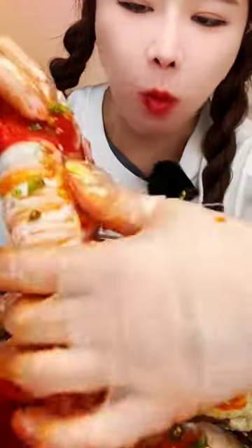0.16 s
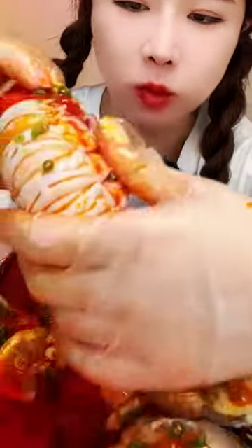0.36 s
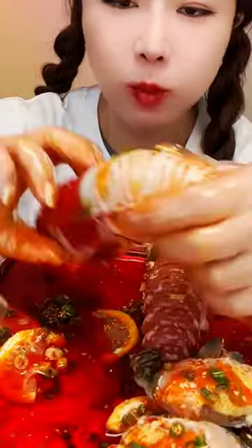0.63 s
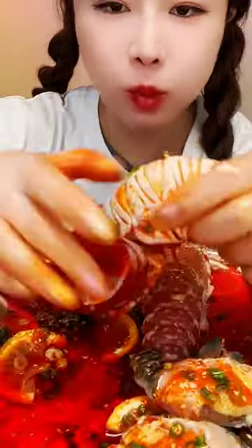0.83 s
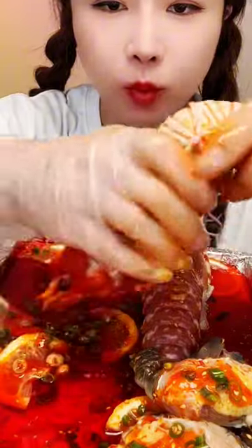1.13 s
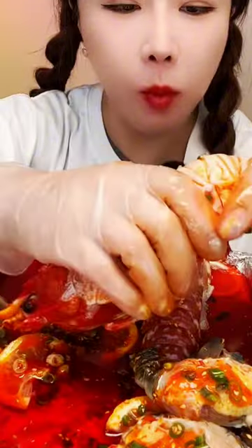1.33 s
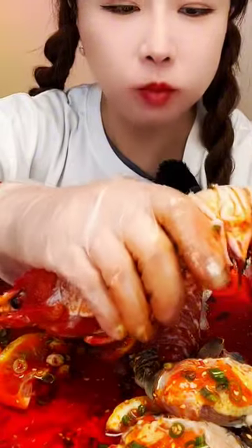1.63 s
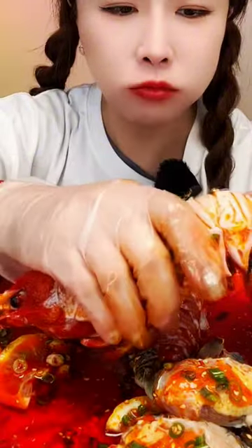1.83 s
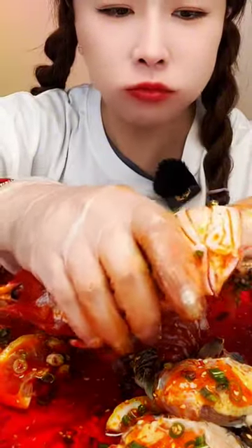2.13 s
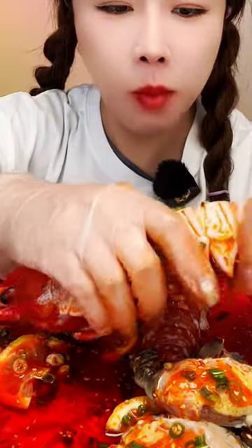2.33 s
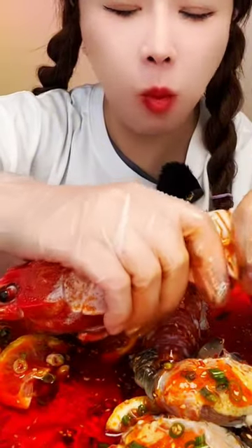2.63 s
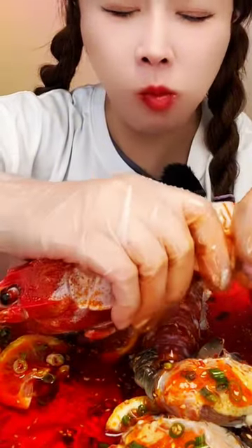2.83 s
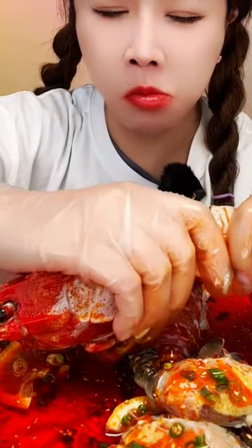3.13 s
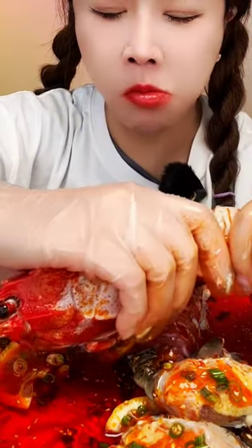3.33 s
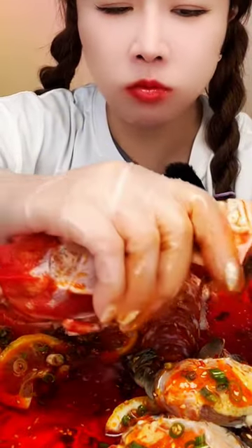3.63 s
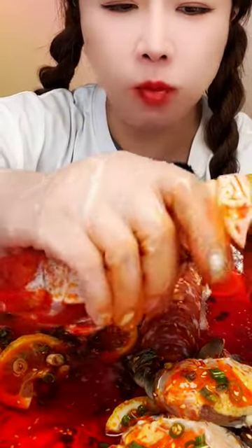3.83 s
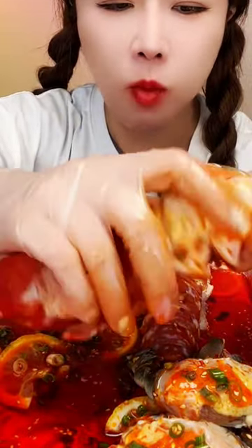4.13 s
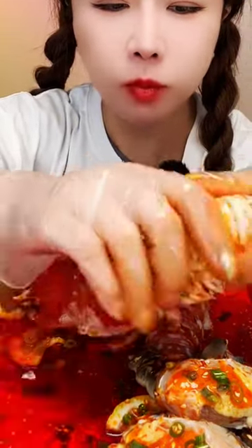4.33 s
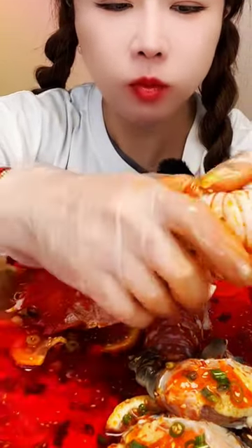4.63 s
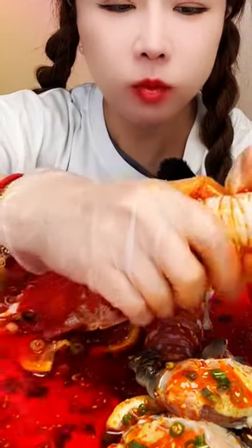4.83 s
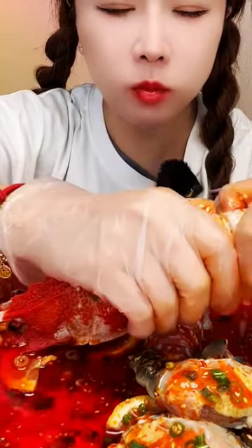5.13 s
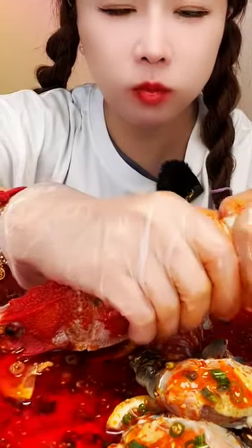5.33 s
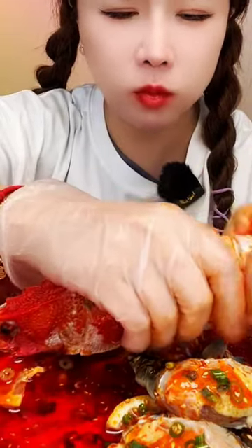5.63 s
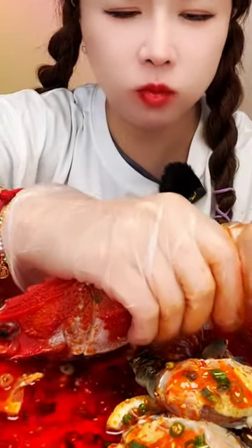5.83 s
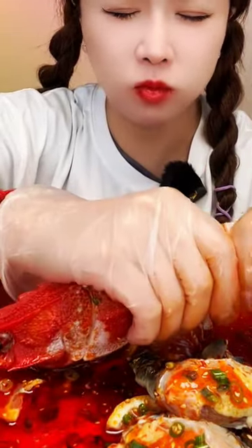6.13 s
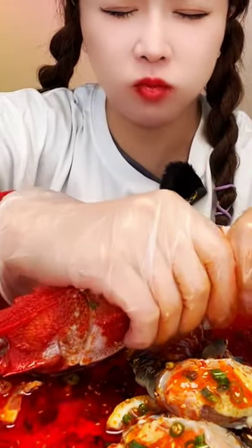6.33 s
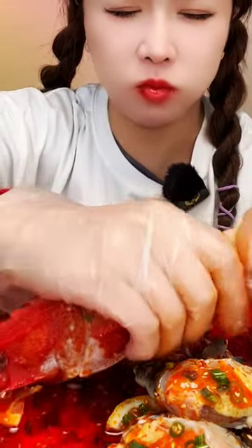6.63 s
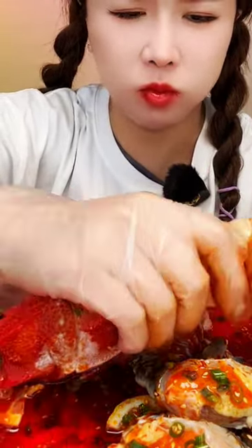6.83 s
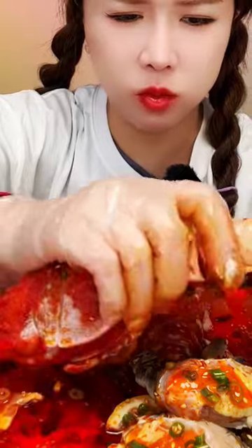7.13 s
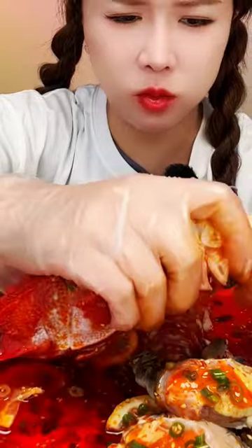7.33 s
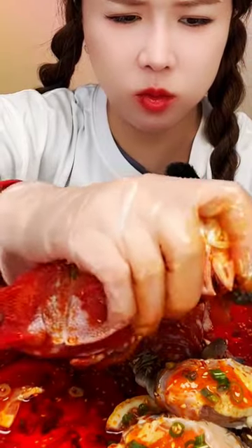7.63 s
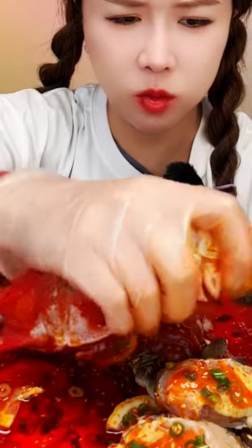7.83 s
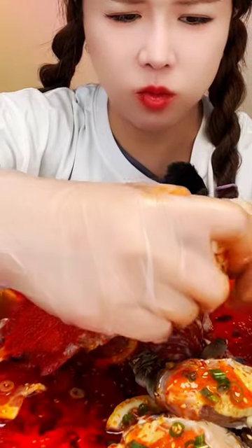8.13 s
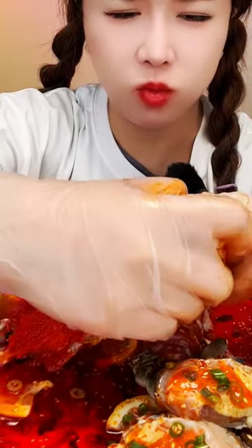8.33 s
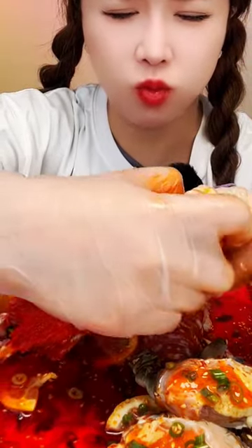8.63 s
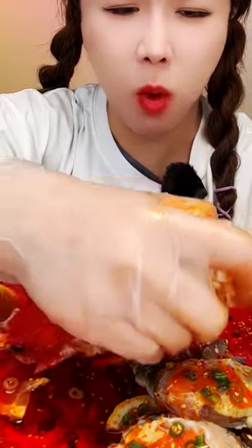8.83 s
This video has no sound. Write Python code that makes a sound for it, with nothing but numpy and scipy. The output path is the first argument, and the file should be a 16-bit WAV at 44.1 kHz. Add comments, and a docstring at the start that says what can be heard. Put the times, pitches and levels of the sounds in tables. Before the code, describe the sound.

Close to the microphone in a small room, a lobster is pulled apart by hand. Sticky squelches, little plops and a knocking crack come first, followed by loud, crisp snaps of shell. Uneven bursts of cracking and tearing continue throughout, separated by quieter ticking and wet rubbing. Oily plastic gloves crinkle with each grip, and a soft rumble and faint low hum lie underneath.

```python
"""Twisting a lobster apart

Hands in thin plastic gloves break a cooked lobster over a tray of sauce, close-miked in a small room.
The shell cracks, pings and tears in runs of splinters; wet flesh squelches, sauce slops, and the gloves
crinkle and slide with each grip. Underneath: dull hand rumble, a low hum, faint room noise.
Hard snaps make the gain control duck everything; it recovers within about a quarter second."""
import sys
import numpy as np
from scipy import signal
from scipy.fft import rfft, irfft
from scipy.io import wavfile
from scipy.ndimage import uniform_filter1d, minimum_filter1d

SR = 44100
rng = np.random.default_rng(int(sys.argv[2]) if len(sys.argv) > 2 else 0)


def pcm_store(signal):
    """Save signal as 16-bit PCM."""
    levels = np.round(np.clip(np.atleast_2d(signal), -1, 1) * 32767)
    wavfile.write(sys.argv[1], SR, levels.astype(np.int16).T)


N = 395577
TIME_S = np.arange(N) / SR
BOTTOM_HZ, TOP_HZ = 38, 15600
SLIPS_PER_S, SLIP_SPREAD_DB = 10000, 2.3
CRINKLE, RUBBING = 1, 2  # columns of HAND_WORK

# Levels are relative within each table.
# weight of the handling: time_s, level_db
RUMBLE_LEVELS = [(0.0, -45.5), (0.59, -44.5), (0.7, -43), (0.79, -42), (0.98, -51), (1.08, -48),
                 (1.19, -45.5), (1.77, -43.5), (1.82, -48), (2.26, -51.5), (2.75, -44.5), (2.81, -61),
                 (2.98, -49.5), (3.1, -45), (3.15, -38.5), (3.2, -54.5), (3.53, -46), (3.86, -46),
                 (4.07, -45.5), (4.16, -57), (4.26, -46.5), (4.57, -51.5), (4.78, -44), (4.87, -53),
                 (4.98, -44), (5.1, -54), (5.21, -43), (5.31, -54), (5.41, -46), (5.46, -54), (6.11, -44.5),
                 (6.52, -49.5), (6.6, -55), (6.78, -52.5), (7.22, -45), (7.32, -49), (7.74, -43),
                 (7.83, -56), (7.89, -50), (8.09, -53), (8.4, -47), (8.53, -56), (8.89, -47), (8.97, -53)]
# low hum: time_s, level_db
HUM_LEVELS = [(0, -59), (2.2, -59), (2.6, -46), (3.3, -49.5), (3.65, -37), (3.85, -51.5), (5.6, -69),
              (5.9, -47), (6.3, -70), (8.97, -74)]
# steady work of the hands: time_s, crinkle_db, rubbing_db
HAND_WORK = [(0, -40.5, -42.5), (.55, -43.5, -41.5), (.8, -48, -44.5), (1.3, -37, -38.5),
             (1.65, -49.5, -46.5), (1.9, -46.5, -52), (2.2, -50, -52), (2.4, -43, -44.5), (2.7, -47, -48.5),
             (2.85, -57, -56.5), (3.3, -50, -48), (3.45, -54, -50), (3.65, -40, -43), (4.4, -40.5, -48.5),
             (5.0, -47, -44), (5.55, -44, -50), (6.1, -49, -44), (6.6, -48.5, -56), (7.05, -49, -45),
             (7.6, -43, -44), (8.3, -53.5, -55), (8.97, -43, -46)]
# swells of crinkle and rubbing: peak_s, half_length_s, crinkle_db, rubbing_db
# at 2.015 s a hissing tail after the loud crack; the rest are grips
SWELLS = [(0.235, 0.13, -41, -66), (0.677, 0.029, -38, -33.5), (0.93, 0.084, -35, -40),
          (1.047, 0.042, -33.5, -33), (1.32, 0.022, -41, -30.5), (1.459, 0.074, -40, -34),
          (2.015, 0.052, -28.5, -38), (2.364, 0.06, -39, -42), (3.572, 0.057, -39.5, -44.5),
          (4.176, 0.075, -30.5, -38.5), (4.718, 0.066, -37.5, -52), (6.837, 0.098, -48, -62.5),
          (7.288, 0.074, -33.5, -48), (7.798, 0.012, -35, -44), (8.73, 0.026, -37, -58),
          (8.923, 0.017, -33, -60)]
# shell snaps: start_s, level_db, pitch_hz, knock_db, splinters_db
SHELL_CRACKS = [(0.0283, -27.5, 4530, -15, -7), (0.1638, -26, 5130, -16, 0), (0.1904, -24, 3850, 1, -21),
                (0.2215, -20, 4670, -11, -14), (0.5617, -25.5, 5230, 4.5, 2), (0.6123, -29, 7000, -14, -6),
                (0.521, -9, 8650, -27, -24), (0.7176, -4.5, 4900, -10, 0), (0.9064, -26, 5800, -20, -9),
                (0.9301, -24.5, 8650, 1.5, 4), (0.946, -16, 9150, -19, -5), (1.242, -19, 10200, -28, -11),
                (1.273, -29, 5000, 3, -2), (1.3058, -31, 5240, 5, -5), (1.3198, -18.5, 6400, -22, -12),
                (1.521, -26.5, 6500, -12, 0), (1.7114, -25.5, 6060, -27, 0), (1.7325, -28, 6200, -17, -9),
                (1.7598, -24.5, 9400, -2.5, 10.5), (1.792, 8, 9200, -27, 3), (1.916, -28, 9000, -20, -10),
                (1.9638, 11, 7800, -12, 5.5), (2.0799, -5.5, 11100, -8.5, -1.5), (2.132, -31, 4230, -3, 6),
                (2.1455, -33, 4400, -20, -7), (2.154, -32, 4400, -9, -3), (2.158, -28, 4240, -19, 5),
                (2.165, -26, 4280, -27, 2), (2.2717, -28.5, 4000, 0.5, -6), (2.328, -29, 5340, -2, -6),
                (2.3445, -28, 8500, -17, -4), (2.351, -28, 5070, -17, -8), (2.3645, -20, 5700, -4.5, -15),
                (2.3869, -16, 6360, -32, -21), (2.5583, -30.5, 7000, 7.5, -12), (2.7571, 1, 9000, -18, 3),
                (2.761, -4, 9200, -13.5, 1), (2.7786, 3.5, 7750, -11.5, 1), (2.9145, -35, 11500, -25, -15),
                (2.9256, -35, 10400, -27, -21), (2.997, -22.5, 7000, -18, 6),
                (2.9967, -26.5, 1760, -17, -5), (3.0091, 2, 9400, -15.5, 2.5),
                (3.0134, -10, 8900, -20, -11), (3.0527, -3, 6650, -22, -7), (3.134, -17, 9300, -12.5, -14),
                (3.1378, -17, 9400, -21, -12), (3.166, 3.5, 8400, -13, 6), (3.314, -22, 9500, -21, -15),
                (3.324, -23, 9300, -18, -21), (3.352, -3, 10200, -32, -16), (3.3906, -22, 8300, -35, 7),
                (3.413, -39, 10000, -22, -9), (3.426, -34, 9500, -11, -4), (3.473, -33, 10000, -22, -8),
                (3.483, -30.5, 4850, -13, -12), (3.536, -27, 5500, -4, -4), (3.6103, -22, 3970, -7, -22),
                (3.6786, -31.5, 2310, 4.5, -6), (3.7033, -24, 6860, -6, -12), (3.7587, -22, 8950, -23, -8),
                (3.7775, -23, 5300, -16, 5), (3.7822, -29, 5340, -24, -11), (3.9183, -18.5, 4400, -7, -14),
                (3.9304, -15.5, 4730, -3.5, -5), (4.093, -10, 9800, -35, -9), (4.11, -16, 4100, -3, -8),
                (4.1483, -18, 4240, -25, -8), (4.2002, -17, 4500, -20, -12), (4.2061, -11.5, 4180, -2, -15),
                (4.2335, -25, 5000, 0, -10), (4.2758, -19.5, 6860, -2, -11), (4.7502, -22, 6300, 6.5, -6),
                (4.8153, -10, 5440, -8, 4), (4.9201, -25, 4300, 2, 3), (5.045, -26.5, 4740, 1.5, -4),
                (5.081, -25, 5400, -24, -6), (5.1926, -28, 9900, -1, 7), (5.2465, 1, 8850, -24, -27),
                (5.2912, -9, 11000, -19, -7), (5.4186, 3.5, 10700, -18, 8), (5.422, 3.5, 9600, -19.5, -15),
                (5.4492, -7, 10500, -23, -13), (5.456, -7.5, 5840, -16, -3), (5.5516, -35, 4800, 3, 7),
                (5.7504, -19, 11000, -28, -20), (5.793, -28, 4530, -10, -17), (6.1945, -29, 4570, -19, -17),
                (6.2345, -27, 11600, -33, -1), (6.2715, 1, 10500, -20, -15), (6.272, -11, 5400, -17, -11),
                (6.31, -17.5, 7000, -24, -19), (6.428, -2.5, 5660, -18.5, 0), (6.43, -7, 11800, -21, -8),
                (6.5153, -3, 8850, -6, 14), (6.5245, -4, 5900, -14, 3), (6.537, -11, 7000, -14, -1),
                (6.5496, 1.5, 6900, -18, -6), (6.699, -30, 5500, -2.5, 5.5), (6.762, -29.5, 4970, -14, -11),
                (6.816, -34.5, 5170, 0, 2), (6.897, -18.5, 5070, -7, -4), (7.1205, -26.5, 10300, -18, -20),
                (7.1683, -25, 10800, -16, 4), (7.288, -27, 6260, -13, 10.5), (7.463, -27, 9500, -13, -4),
                (7.4873, -14, 4900, -9, -22), (7.5021, -24, 4200, -27, -21), (7.562, -33, 7040, -11, 15),
                (7.7167, -26, 4070, -4, 4), (7.8017, -18.5, 5160, -18, -11), (7.8714, -26, 4550, -3.5, -23),
                (7.9207, -29, 8500, -4, -6), (7.932, -25.5, 8000, -9, 6), (7.9452, 0.5, 9200, -25, -4.5),
                (7.952, -9, 9500, -20, -5), (7.9634, -11, 9000, -17, 1), (8.0267, -24.5, 10800, -5, 4),
                (8.0597, -3, 4350, -15.5, -17), (8.0599, 4, 11000, -22, -15),
                (8.1366, -15, 7150, -19.5, -6), (8.1727, -21, 6550, -33, 6), (8.2358, -27, 10200, -21, -7),
                (8.249, -27, 7000, -22, -14), (8.2533, -30, 6270, -25, -7), (8.3242, -22.5, 9700, -19, 1),
                (8.3417, -32, 11000, -14, -3), (8.611, -28.5, 5800, -9, -1), (8.6305, -28, 8050, -22, -8),
                (8.3666, -22, 10000, -12, 7.5), (8.394, -26, 10000, -22, -18), (8.4341, 3, 9200, -26, -1.5),
                (8.5464, -18, 9500, -27, -16), (8.5884, -24, 9900, -11, 4), (8.6446, -30, 4320, 0.5, 7),
                (8.6699, -26.5, 5400, -31, -16), (8.7168, -20, 9550, -9.5, -5),
                (8.7545, -20, 9700, -21, -6), (8.7797, -27, 9000, -6.5, -6),
                (8.8215, -32.5, 6700, -3.5, 13), (8.8285, -27.5, 9100, -4, 12),
                (8.951, -4.5, 4670, -18, -17), (8.9513, -16, 2500, -36, -23)]
# air squeezed through wet flesh: start_s, length_s, level_db, pocket_hz
FLESH_SQUELCHES = [(0.029, 0.02, -36.5, 1290), (0.095, 0.02, -34, 667), (0.3, 0.053, -28.5, 840),
                   (0.451, 0.0041, -26.5, 690), (0.488, 0.0093, -28, 645), (0.67, 0.0036, -21, 517),
                   (0.6776, 0.0024, -17, 605), (0.682, 0.0037, -20, 990), (0.7162, 0.0024, -4.5, 574),
                   (1.075, 0.013, -22.5, 614), (1.257, .02, -34, 1060), (1.3385, 0.007, -22.5, 586),
                   (1.44, 0.02, -24.5, 514), (1.463, 0.0065, -20.5, 860), (1.495, 0.0033, -25, 675),
                   (2.244, 0.032, -35, 840), (2.422, 0.046, -30, 715), (3.53, .02, -29.5, 720),
                   (3.675, .0046, -41, 1390), (3.87, 0.0061, -20.5, 860), (3.901, 0.012, -24.5, 417),
                   (4.159, 0.039, -29, 950), (4.228, 0.01, -27, 570), (4.266, 0.038, -28.5, 1160),
                   (4.323, 0.039, -26.5, 600), (4.676, 0.0088, -32, 890), (4.746, 0.008, -31, 1240),
                   (4.77, 0.019, -34, 1180), (4.902, 0.023, -41.5, 1140), (5.141, 0.016, -33.5, 820),
                   (7.559, .012, -33, 900), (8.887, 0.0047, -25.5, 990), (8.896, 0.027, -36.5, 1120)]
# sauce in the tray: start_s, length_s, level_db, pitch_hz
SAUCE_SLOSHES = [(0.069, 0.11, -42, 343), (0.091, 0.07, -40, 660), (0.328, 0.14, -41, 366),
                 (0.435, 0.077, -46, 637), (0.737, 0.06, -46, 390)]
# oily glove skids on the shell: start_s, length_s, level_db, hiss_hz
GLOVE_SKIDS = [(0.605, 0.1, -36.5, 6300), (1.005, 0.076, -37.5, 4730), (1.094, 0.094, -34, 6400),
               (1.163, 0.078, -36, 6540), (1.245, 0.065, -41, 6340), (1.384, 0.093, -36, 6040),
               (8.731, 0.038, -37, 5800), (8.845, 0.02, -33.5, 5430)]
# runs of splinters: start_s, length_s, level_db
SHELL_TEARS = [(0.669, 0.036, -31), (0.92, 0.083, -33), (1.31, 0.024, -32), (1.336, 0.0095, -27),
               (1.961, 0.059, -22.5), (2.554, 0.0089, -27), (4.1, 0.018, -25), (4.164, 0.038, -25),
               (4.272, 0.029, -25), (5.246, 0.067, -28), (6.418, 0.011, -40), (6.508, 0.028, -25),
               (7.479, 0.034, -33), (7.773, 0.057, -33), (8.877, 0.039, -30.5)]
# low damped tones: start_s, level_db, pitch_hz, decay_cycles
# at 0.719 s the tray's hollow ring after the knock; the rest are plops of air in the meat
LOW_TONES = [(.6768, -10.5, 560, 1.2), (.6845, -12.5, 630, 2.7), (.7172, 0, 447, 1.3), (.719, -31, 395, 11),
             (1.0765, -15.5, 368, 2), (1.0825, -15.5, 704, 1.5), (1.133, -26, 660, 2.3),
             (1.3395, -16.5, 975, 6.2), (1.4465, -21.5, 467, 2.6), (1.4645, -19, 710, 2.5),
             (1.4937, -11.5, 710, 1.24), (3.913, -24, 358, 4.2), (4.3475, -24, 624, 1.7),
             (6.5075, -19.5, 810, 1.4)]
# thick shell crunching: start_s, length_s, level_db, pitch_hz
SHELL_BUCKLES = [(0.685, 0.0047, -31, 2200), (1.963, 0.0016, -10, 2900), (3.052, 0.0011, -15.5, 1690),
                 (3.679, 0.0029, -29, 1690), (5.4176, 0.0028, -16, 3020), (6.5147, 0.0053, -18.5, 2110),
                 (6.52, .002, -35, 2700), (6.868, 0.0012, -29, 2780), (7.561, 0.0081, -38, 2100),
                 (8.891, 0.0027, -28, 2620), (8.914, 0.009, -34.5, 1640)]
# hollow segments breaking: start_s, level_db, mode1_hz, mode2_hz, mode3_hz, step_db, decay_s
SEGMENT_PINGS = [(3.8362, 0, 5100, 9700, 7150, 0, 0.0006), (4.533, -2.5, 5300, 6400, 10000, -14, 0.00036),
                 (5.071, -14.5, 4340, 5650, 1790, -14, 0.00034),
                 (5.595, -10.5, 5000, 9600, 11000, -2, 0.00027),
                 (5.728, -5.5, 5160, 7350, 10700, -13, 0.00045),
                 (6.8705, -4, 4080, 6760, 8740, -4.5, 0.00039),
                 (8.5043, 1.5, 6100, 9600, 5000, -2.5, 0.00043)]
# cavity of shell and cupped hands: pitch_hz, width_hz, level_db
HOLLOW_MODES = [(413, 84, -9), (705, 44, 3.5), (924, 95, 8), (1198, 130, 13), (1790, 480, 8)]
# reflections from tray, table and chest: delay_s, level_db
EARLY_ECHOES = [(.0011, -57), (.0028, -18.5), (.0037, -36)]
# spectra of the sources, walls and microphone: freq_hz, gain_db
RUMBLE_SPECTRUM = [(20, -10), (50, -7), (85, -1), (140, 2), (220, 1.5), (330, -4.5), (600, -15),
                   (1500, -36)]
AIR_SPECTRUM = [(20, 21.5), (90, 4), (200, -14), (600, -34), (1500, -0.5), (3000, -6), (5000, -33),
                (10000, -18), (16000, -35)]
GLOVE_SPECTRUM = [(800, -16), (2000, -8.5), (2900, -5), (3600, -1), (4300, 3), (6200, 5), (7600, 2),
                  (9600, 1.5), (12000, -0.5), (13500, -6), (16000, -9)]
WET_SPECTRUM = [(50, -21), (150, -11), (380, 6), (650, 5), (850, 3.5), (1150, 2), (1500, -8.5),
                (2100, -11.5), (3000, -11), (6000, -19)]
SHELL_SPECTRUM = [(200, -36.5), (600, -1), (1800, -6), (2900, -6), (4200, 3), (6000, 7.5), (7500, 6.5),
                  (9500, 10.5), (12000, 4.5), (16000, 8)]
WALL_SPECTRUM = [(100, -29), (400, -6.5), (1500, 10), (3000, 7), (6000, 2.5), (9000, 6.5), (12000, -4),
                 (16000, 3)]
MIC_SPECTRUM = [(200, -1.5), (1000, -1), (1600, 5), (2150, 4.5), (2850, 0), (3800, 5), (8000, 0.5),
                (11000, 1.5), (15000, -5.5)]


def undb(db):
    """Decibels to gain."""
    return 10 ** (np.asarray(db) / 20)


def unit_rms(x):
    """Scale to rms 1."""
    return x / np.sqrt(np.mean(x ** 2) + 1e-20)


def unit_energy(x):
    """Scale to energy 1."""
    return x / np.sqrt(np.sum(x ** 2) + 1e-20)


def curve(table, column=1):
    """Table column, interpolated linearly in time."""
    rows = np.array(table)
    return np.interp(TIME_S, rows[:, 0], rows[:, column])


def add(out, start_s, x):
    """Mix x into out at start_s."""
    i = int(np.clip(start_s * SR, 0, N - 1))
    out[i:i + len(x)] += x[:N - i]


def through(x, response):
    """Convolve, keeping the length of x."""
    return signal.oaconvolve(x, response)[:len(x)]


def colour(spectrum, size=2048):
    """Minimum-phase impulse response of a spectrum, energy 1."""
    hz, db = np.transpose(spectrum)
    bins_hz = np.arange(size // 2 + 1) * SR / size
    cepstrum = irfft(np.log(undb(np.interp(np.log(bins_hz + 1), np.log(hz), db))))
    cepstrum[1:size // 2] *= 2
    cepstrum[size // 2 + 1:] = 0
    return unit_energy(irfft(np.exp(rfft(cepstrum))))


def ring(hz, decay_s, glide=0, size=1024):
    """Damped mode, energy 1; pitch rises by the fraction glide in each of the first two decay times."""
    t = np.arange(size) / SR
    pitch_hz = hz * (1 + glide * np.minimum(t / decay_s, 2))
    return unit_energy(np.exp(-t / decay_s) * np.sin(2 * np.pi * np.cumsum(pitch_hz) / SR))


def wander(steps_per_s):
    """Ramps between random levels, rms 1."""
    step = int(SR / steps_per_s)
    held = np.repeat(rng.standard_normal(N // step + 1), step)
    return unit_rms(uniform_filter1d(held, step)[:N])


def clicks(per_s, spread_db, size=N):
    """Random impulses of either sign, mostly small, rms near 1."""
    chance, strength, side = rng.random(size), rng.standard_normal(size), rng.random(size)
    height = undb(spread_db * np.minimum(strength, 2))
    typical = np.sqrt(np.mean(height[:2048] ** 2))
    return (chance < per_s / SR) * np.sign(side - .5) * height / typical * np.sqrt(SR / per_s)


def hollow():
    """Impulse response of the hollow shell: broad, short-lived modes."""
    modes = (undb(db) * ring(hz, 1 / (np.pi * width_hz), size=2048) for hz, width_hz, db in HOLLOW_MODES)
    return unit_energy(sum(modes))


def small_source(x, cutoff_hz=304):
    """A shell or an air pocket is too small to radiate bass."""
    return signal.sosfilt(signal.butter(2, cutoff_hz, "high", fs=SR, output="sos"), x)


def activity(column):
    """Gain of crinkle or rubbing: steady hand work plus bell-shaped swells."""
    power = undb(curve(HAND_WORK, column)) ** 2
    for peak_s, half_s, *levels_db in SWELLS:
        near = np.abs(TIME_S - peak_s) < 2 * half_s
        swell = np.exp(-2 * ((TIME_S[near] - peak_s) / half_s) ** 2)
        power[near] += undb(levels_db[column - 1]) ** 2 * swell
    return np.sqrt(power)


def background(hum_hz=89.8, hum_width_hz=7, air_db=-60):
    """Dull handling rumble, a narrow wavering hum and steady room noise."""
    rumble, hum, air = rng.standard_normal((3, N))
    rumble = through(rumble, colour(RUMBLE_SPECTRUM)) * undb(curve(RUMBLE_LEVELS) + 2.5)
    band_hz = [hum_hz - hum_width_hz / 2, hum_hz + hum_width_hz / 2]
    hum = signal.sosfilt(signal.butter(2, band_hz, "band", fs=SR, output="sos"), hum)
    hum_phase = np.angle(signal.hilbert(hum))
    hum = unit_rms(np.cos(hum_phase)) * undb(curve(HUM_LEVELS))
    return rumble + hum + undb(air_db) * through(air, colour(AIR_SPECTRUM))


def gloves(creases_per_s=90, crease_db=-6, crease_s=0.0031):
    """Oily film slides in tiny slips and buckles in soft creases, more often under effort."""
    work = activity(CRINKLE)
    slips = rfft(clicks(SLIPS_PER_S, SLIP_SPREAD_DB) * undb(-2 + 3 * wander(90)))
    bins_hz = np.arange(len(slips)) * SR / N
    edges_hz = [0, 3500, 4800, 6400, 8500, 11000, SR]
    slide, creases, t = np.zeros(N), np.zeros(N), np.arange(512) / SR
    for low_hz, high_hz in zip(edges_hz, edges_hz[1:]):  # film patches of each size catch and let go
        patch = irfft(slips * ((bins_hz >= low_hz) & (bins_hz < high_hz)), N)
        slide += patch * undb(2 * wander(40))
    pitches_hz = np.geomspace(4200, 11000, 12)
    each_per_s = creases_per_s / len(pitches_hz) * np.sqrt(unit_rms(work))
    for hz in pitches_hz:
        burst = rng.standard_normal(len(t)) * np.exp(-t / crease_s)
        scrunch = unit_energy(through(burst, np.diff(ring(hz, 0.00013))))
        creases += through(clicks(each_per_s, spread_db=4.5), scrunch) / np.sqrt(len(pitches_hz))
    return through(work * slide, colour(GLOVE_SPECTRUM)) + undb(crease_db) * work * creases


def flesh(pops_per_s=1400, hollow_db=-14, bubbles_per_s=70, bubble_db=-8, decay_cycles=2.95):
    """Fingers rub wet meat: sticky pops that come and go, a few rounder bubbles in the sauce."""
    work = activity(RUBBING)
    pops = clicks(pops_per_s, spread_db=5) * work * undb(-2.5 + 2.5 * wander(45))
    rubbing = through(pops, colour(WET_SPECTRUM)) + undb(hollow_db) * through(pops, hollow())
    bubbles, pitches_hz = np.zeros(N), np.geomspace(300, 800, 10)
    for hz in pitches_hz:
        onsets = clicks(bubbles_per_s / len(pitches_hz), spread_db=6.4)
        bubbles += through(onsets, ring(hz, decay_cycles / hz, glide=0.14, size=2048))
    return rubbing + undb(bubble_db) * work * unit_rms(bubbles)


def unsticking(per_s=45, hz=9000, decay_s=0.00006):
    """Oily film peels off the shell in lone clicks, even with the hands almost still."""
    click = unit_energy(np.diff(ring(hz, decay_s), prepend=0))
    peel = through(clicks(per_s, spread_db=5), click)
    return undb(-53) * unit_rms(activity(CRINKLE)) ** 0.3 * peel


def chips(per_s=26, chip_hz=7000, chip_cycles=2.7, pop_hz=1050, pop_cycles=3.7, splinter_s=0.00087):
    """Wet shell chips crackle at random, louder under effort: a ring, a pop of sauce, splinters."""
    out, shell, t = np.zeros(N), colour(SHELL_SPECTRUM), np.arange(1024) / SR
    work = unit_rms(activity(CRINKLE)) ** 0.65
    traits = rng.standard_normal((600, 5)).clip(-2, 2)
    starts_s = np.cumsum(rng.exponential(size=len(traits))) / per_s
    for start_s, (strength, pitch, spread, pocket, wetness) in zip(starts_s, traits):
        spray = clicks(6000, spread_db=4, size=len(t))
        if start_s < TIME_S[-1]:
            hz, bubble_hz = chip_hz * 2 ** (0.4 * pitch), pop_hz * 2 ** (0.55 * pocket)
            plate = unit_energy(np.diff(ring(hz, chip_cycles / hz), prepend=0))
            pop = undb(-10 + 2.9 * wetness) * ring(bubble_hz, pop_cycles / bubble_hz, glide=0.14)
            chip = unit_energy(plate + shell[:len(t)] / 2) + pop
            spray *= np.exp(-t / (splinter_s * 2 ** (spread / 2)))
            splinters = undb(-1) * unit_energy(through(spray, chip))
            add(out, start_s, undb(-37 + 3 * strength) * work[int(start_s * SR)] * (chip + splinters))
    return out * np.sqrt(SR / 1000)  # energy 1 -> rms 1 over 1 ms


def cracks(decay_cycles=2.4, side_mode_db=-10, strain_s=0.0012, splinter_s=0.0013, knock_hz=1000):
    """The shell strains in tiny fractures, snaps, rings, sheds splinters and knocks its hollow."""
    out, shell, size = np.zeros(N), colour(SHELL_SPECTRUM), 2048
    t, lead_s = np.arange(size) / SR, size / SR
    knock = unit_energy(ring(knock_hz, 0.00037, size=size) + undb(-5) * hollow())
    for start_s, level_db, hz, knock_db, splinters_db in SHELL_CRACKS:
        decay_s = decay_cycles / hz
        plate = ring(min(hz, TOP_HZ), decay_s, size=size)
        for ratio in rng.uniform([.72, 1.12], [.88, 1.45]):  # curved plate: a close mode on each side
            plate += undb(side_mode_db) * ring(min(hz * ratio, TOP_HZ), decay_s, size=size)
        plate = unit_energy(np.diff(plate, prepend=0))  # small plate: little bass
        lowpass = signal.butter(2, min(3.14 * hz, SR / 2 - 1000), fs=SR)  # large plate: slower, duller
        snap = undb(-1 + 0.16 * min(level_db, 0)) * shell  # a gentle break is mostly ring
        crack = unit_energy(signal.lfilter(*lowpass, plate + snap))
        shedding = clicks(9000, spread_db=2, size=size) * np.exp(-t / splinter_s)
        splinters = undb(splinters_db - 4) * unit_energy(through(shedding, crack + snap))
        build_up = clicks(9000, spread_db=6.9, size=size) * np.exp(-t[::-1] / strain_s)
        strain = unit_energy(through(build_up, crack + snap))
        add(out, start_s, undb(level_db) * (crack + splinters + undb(knock_db) * knock))
        if start_s > lead_s:
            add(out, start_s - lead_s, undb(min(level_db, 0) - 21) * strain)
    return out * np.sqrt(SR / 1000)


def squelches(bubbles_per_s=1100, scatter_octaves=0.64, pop_cycles=1.1, pocket_cycles=2.6, fizz_hz=1700):
    """Clustered bubbles burst, fizz in the sauce and ring the air pocket and the hollow around it."""
    out, body = np.zeros(N), hollow()
    for start_s, length_s, level_db, pocket_hz in FLESH_SQUELCHES:
        burst = np.zeros(int(length_s * SR) + 2048)
        count = int(np.clip(length_s * bubbles_per_s, 3, 60))
        for k, (place, pitch, strength) in enumerate(rng.standard_normal((60, 3))[:count]):
            i = int(length_s * SR * (k + place % 1) / count)
            hz = min(pocket_hz * 2 ** (scatter_octaves * pitch), TOP_HZ)
            pop = ring(hz, pop_cycles / hz, glide=0.25, size=2048)
            burst[i:i + len(pop)] += np.sign(place) * undb(4.7 * strength) * pop
        spit = clicks(3300, spread_db=0.69, size=len(burst)) * (np.arange(len(burst)) < length_s * SR)
        fizz = undb(-9) * unit_energy(through(spit, ring(fizz_hz, 0.00014)))
        pocket = undb(-3.5) * unit_energy(through(burst, ring(pocket_hz, pocket_cycles / pocket_hz)))
        cavity = undb(-5) * unit_energy(through(burst, body))
        squelch = unit_energy(unit_energy(burst) + fizz + pocket + cavity)
        add(out, start_s, undb(level_db - 1) * np.sqrt(length_s * SR) * squelch)
    return small_source(out)


def sloshes(bubbles_per_s=80, decay_cycles=4, scatter_octaves=0.13):
    """Sauce slops: a few large, overlapping bubbles of similar pitch."""
    out = np.zeros(N)
    for start_s, length_s, level_db, pitch_hz in SAUCE_SLOSHES:
        count = int(np.clip(length_s * bubbles_per_s, 2, 16))
        for k, (place, pitch, strength) in enumerate(rng.standard_normal((16, 3))[:count]):
            hz = pitch_hz * 2 ** (scatter_octaves * pitch)
            bubble = ring(hz, decay_cycles / hz, glide=0.04, size=4096) * np.sqrt(length_s * SR / count)
            add(out, start_s + length_s * (k + place % 1) / count, undb(level_db + 2 * strength) * bubble)
    return out


def skids(decay_s=0.00011):
    """A glove skids: a swell of tiny slips, each ringing the stretched film."""
    out = np.zeros(N)
    for start_s, length_s, level_db, hiss_hz in GLOVE_SKIDS:
        size = int(length_s * SR)
        slips = clicks(SLIPS_PER_S, SLIP_SPREAD_DB, size) * signal.windows.tukey(size, .7)
        film = through(slips, ring(hiss_hz, decay_s))
        add(out, start_s, undb(level_db - 2) * unit_rms(through(film, colour(GLOVE_SPECTRUM))))
    return out


def tears(fractures_per_s=4000):
    """The shell tears in a dense string of tiny fractures, muffled by the gloves."""
    out = np.zeros(N)
    for start_s, length_s, level_db in SHELL_TEARS:
        size = int(length_s * SR)
        fractures = clicks(fractures_per_s, spread_db=4, size=size) * signal.windows.tukey(size, .5)
        add(out, start_s, undb(level_db - 2) * unit_rms(fractures))
    return through(out, unit_energy(colour(SHELL_SPECTRUM) + colour(GLOVE_SPECTRUM)))


def plops_and_tray(sag=0.048, attack_s=0.0004):
    """Damped tones of sagging pitch: short plops of widening air pockets, one longer ring of the tray."""
    out, t = np.zeros(N), np.arange(2048) / SR
    for start_s, level_db, pitch_hz, decay_cycles in LOW_TONES:
        age = t * pitch_hz / decay_cycles
        envelope = np.exp(-age) * (1 - np.exp(-t / attack_s))
        hz = pitch_hz * (1 - sag * np.minimum(age, 2))
        tone = np.sqrt(2) * np.sin(2 * np.pi * np.cumsum(hz) / SR)
        add(out, start_s, undb(level_db) * envelope * tone)
    return out


def buckles(fractures_per_s=5000, decay_cycles=0.52, low_ratio=0.28, low_db=-4):
    """Woody crunch: quick fractures drive the two lowest modes of a thick, heavily damped plate."""
    out = np.zeros(N)
    for start_s, length_s, level_db, hz in SHELL_BUCKLES:
        size, low_hz = int(length_s * SR), hz * low_ratio
        fractures = clicks(fractures_per_s, spread_db=3, size=size) + .3 * rng.standard_normal(size)
        plate = ring(hz, decay_cycles / hz) + undb(low_db) * ring(low_hz, decay_cycles / low_hz)
        crunch = unit_energy(through(np.pad(fractures, (0, 1024)), np.diff(plate, prepend=0)))
        add(out, start_s, undb(level_db) * np.sqrt(size) * crunch)
    return out


def pings(snap_db=-8, splinter_db=-4, splinter_s=0.0012, knock_db=-17, knock_hz=1200):
    """A break and its after-fractures ring three modes of a segment and lightly knock its hollow."""
    out, shell, size = np.zeros(N), colour(SHELL_SPECTRUM), 2048
    t = np.arange(size) / SR
    knock = undb(knock_db) * unit_energy(ring(knock_hz, 0.00026, size=size) + hollow() / 2)
    for start_s, level_db, *modes_hz, step_db, decay_s in SEGMENT_PINGS:
        modes = sum(undb(k * step_db) * np.diff(ring(hz, decay_s, size=size), prepend=0) / hz
                    for k, hz in enumerate(modes_hz))
        ping = unit_energy(unit_energy(modes) + undb(snap_db) * shell)
        fractures = clicks(6000, spread_db=1.6, size=size) * np.exp(-t / splinter_s)
        splinters = undb(splinter_db) * unit_energy(through(fractures, ping + shell / 2))
        add(out, start_s, undb(level_db) * (ping + splinters + knock))
    return out * np.sqrt(SR / 1000)


def room(x, tail_db=-15, t60_s=0.16, near_db=-16, near_s=0.0056, low_t60_s=0.23, low_hz=385, move_s=0.11):
    """Close echoes, scatter that shifts as the hands move, a short wall tail lingering in the low mids."""
    t, step = np.arange(SR // 3) / SR, int(move_s * SR)
    onset, scatter = 1 - np.exp(-t / 0.0018), np.zeros(N)
    for i in range(0, N, step):
        near, tail = rng.standard_normal((2, len(t))) * onset
        near = undb(near_db) * unit_energy(near * np.exp(-t / near_s))
        tail = undb(tail_db) * unit_energy(tail * undb(-60 * t / t60_s))
        add(scatter, i / SR, signal.fftconvolve(x[i:i + step], near + tail))
    low_tail = rng.standard_normal(len(t)) * onset * undb(-60 * t / low_t60_s)
    response = undb(-28) * unit_energy(through(low_tail, ring(low_hz, 0.0027)))
    response[0] += 1  # direct path
    for delay_s, level_db in EARLY_ECHOES:
        response[int(delay_s * SR)] += undb(level_db)
    return through(x, response) + through(scatter, colour(WALL_SPECTRUM))


def gain_control(x, threshold_db=-9.5, max_duck_db=17, recovery_db_per_s=62, lookahead_s=0.00035):
    """Gain drops at once by the overshoot of the 1 ms level, then climbs back linearly in dB."""
    power = np.maximum(uniform_filter1d(x ** 2, SR // 1000), 1e-12)
    over_db = np.clip(10 * np.log10(power) - threshold_db, 0, max_duck_db)
    recovered_db = recovery_db_per_s * TIME_S
    duck_db = np.maximum.accumulate(over_db + recovered_db) - recovered_db
    size = 2 * int(lookahead_s * SR) + 1
    return x * undb(uniform_filter1d(minimum_filter1d(-duck_db, size), size))


def scene():
    """Shell, flesh, sauce and gloves in the room, over the background."""
    shell = small_source(cracks() + buckles() + tears() + chips() + unsticking())
    shielded_pings = room(small_source(pings()), tail_db=-21)  # the hands screen them from the walls
    sources = shell + squelches() + plops_and_tray() + sloshes() + flesh() + gloves() + skids()
    return (room(sources) + shielded_pings + background())[None]


def record(dry, ceiling=0.46, hold_s=0.00021, gain_db=-2):
    """Microphone colour, gain control, fast peak limiter, bass and top cut."""
    mic = undb(gain_db) * through(dry[0], colour(MIC_SPECTRUM))
    ducked = gain_control(mic)[None]
    size = 2 * int(hold_s * SR / 2) + 1
    peak_gain = ceiling / np.maximum(np.abs(ducked), ceiling)
    limited = ducked * uniform_filter1d(minimum_filter1d(peak_gain, size), size)
    bass_cut = signal.sosfilt(signal.butter(1, BOTTOM_HZ, "high", fs=SR, output="sos"), limited)
    return signal.sosfilt(signal.ellip(8, .2, 70, TOP_HZ, fs=SR, output="sos"), bass_cut)


dry = scene()
out = record(dry)
pcm_store(out)
```